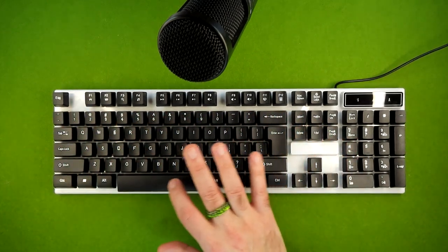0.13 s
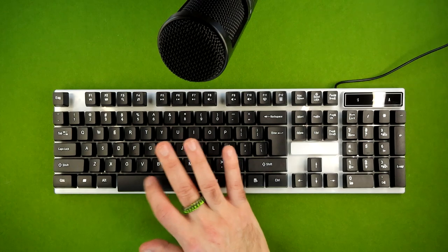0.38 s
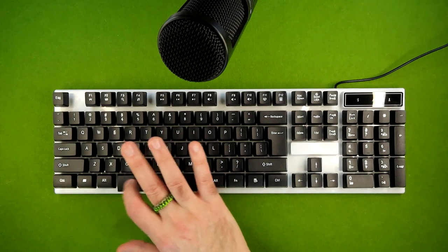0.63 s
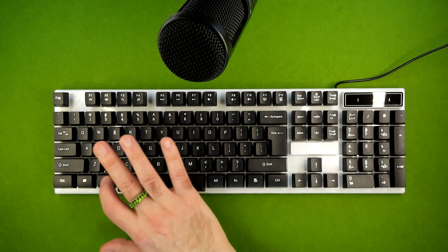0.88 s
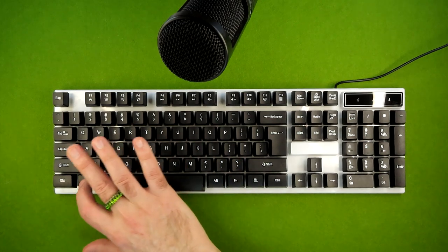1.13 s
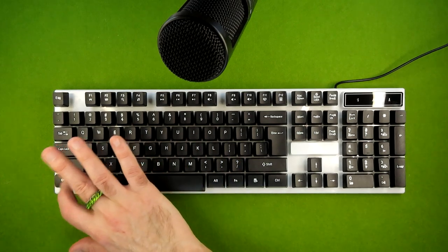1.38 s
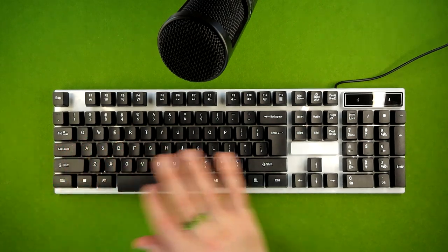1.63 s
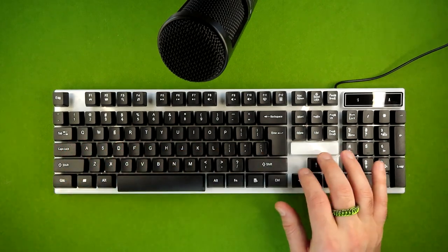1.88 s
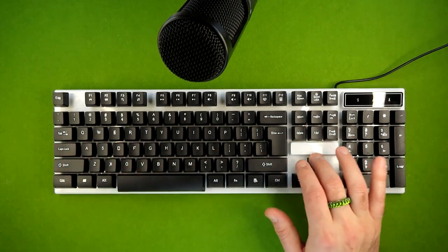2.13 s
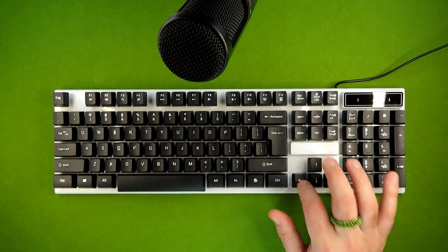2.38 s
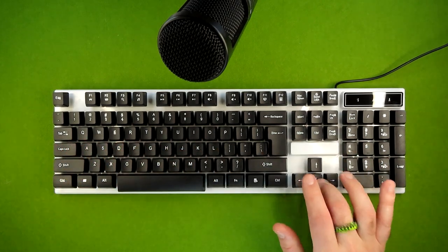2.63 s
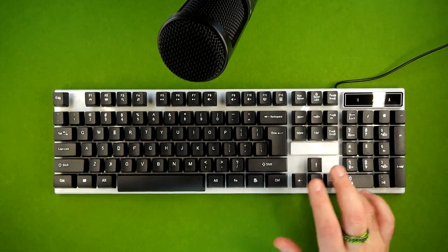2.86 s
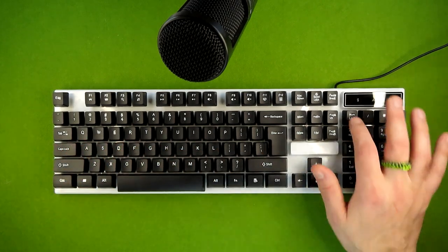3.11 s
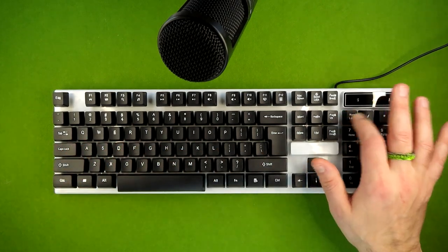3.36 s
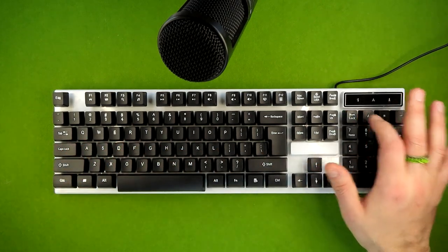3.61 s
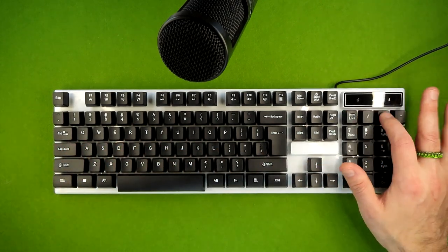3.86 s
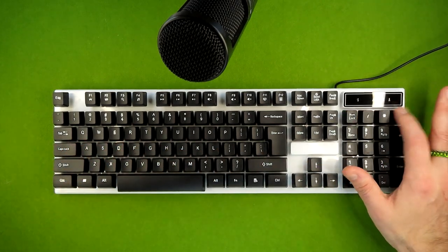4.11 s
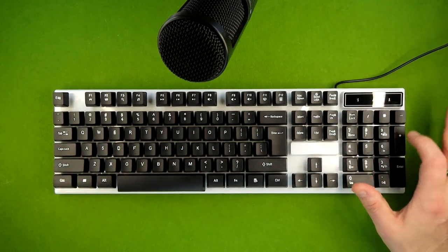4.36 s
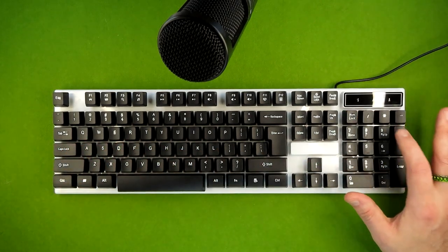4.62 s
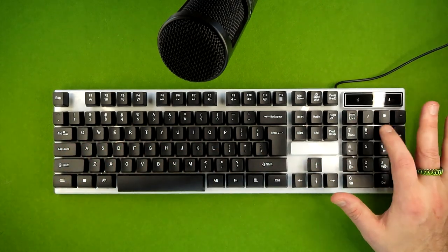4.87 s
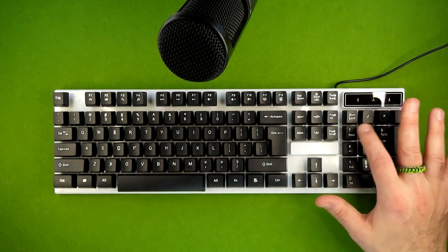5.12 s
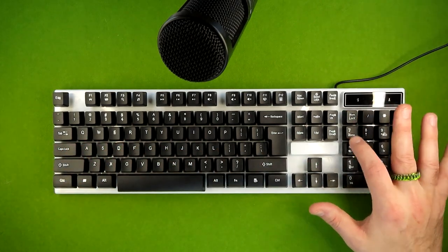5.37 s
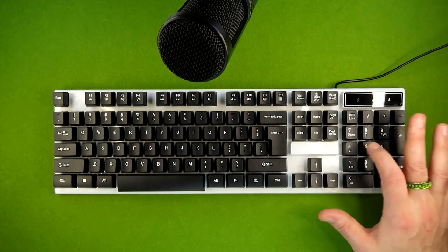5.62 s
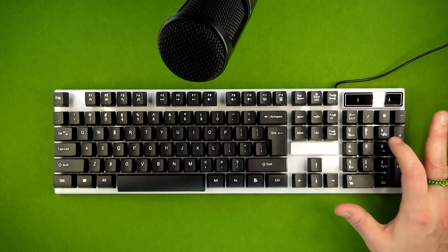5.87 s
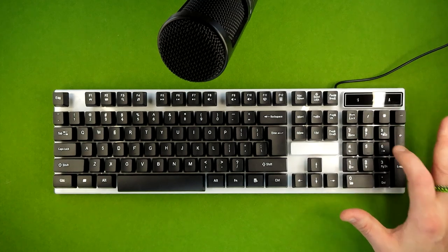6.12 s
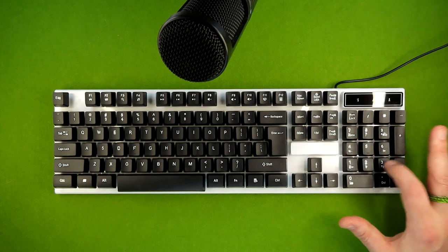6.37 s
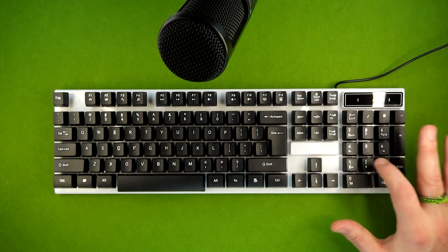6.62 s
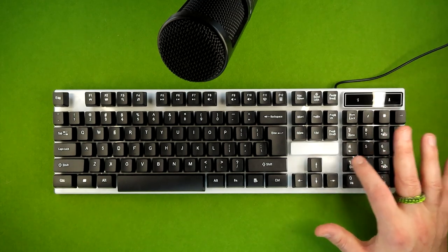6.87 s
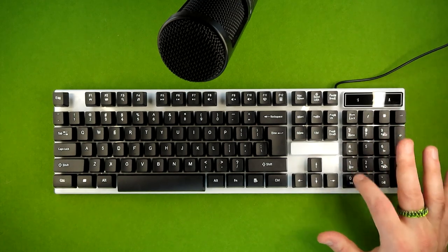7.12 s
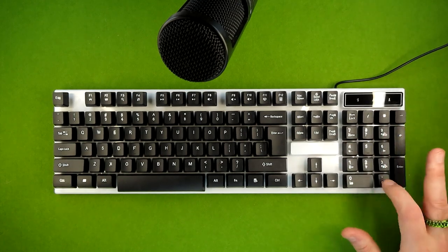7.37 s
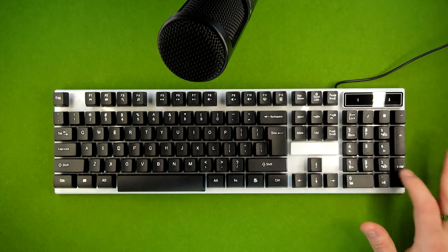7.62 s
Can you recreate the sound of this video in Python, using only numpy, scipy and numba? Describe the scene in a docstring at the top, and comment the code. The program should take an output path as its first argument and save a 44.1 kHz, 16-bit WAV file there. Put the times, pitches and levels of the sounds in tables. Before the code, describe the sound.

A close, dry single-channel microphone hears one finger pressing plastic keys on a light keyboard in a quiet room. From 0 to 1.5 seconds six large loose keys are struck about every 0.28 seconds: the first three clack loud, sharp and bright with hollow rattle, the next three softer. Each release clicks about 0.1 seconds after the press. A gap follows until 2.1, where a hand lands very softly and smaller keys begin, tighter and mid-pitched, until 2.95. After another short pause, strokes resume at 3.3 and run on every quarter second or so, firm around 4.5, faint from 5 to 5.9, then stronger from 6.1 to the last clack near 7.7. Faint stem scraping, creaks and tiny bounce ticks surround the knocks. Presses give low, soft desk thuds with slow wobble. Beneath lie low rumble, faint hiss and a barely audible thin whine.

```python
"""Gritty clicks and clatter of plastic keys on a light keyboard, pressed and released one after another by one finger.
Each knock is a rough contact force driving modes of cap and case, with a faint graze before and chatter after it.
Stems rub in their guides (noise that swells and fades with each stroke), pushes shake desk and microphone stand
(thuds and slow decaying sines), and a hand lands softly once (rustle in the hollow modes).
Behind it: rumble, faint hiss, thin electrical whine."""
import sys
import numpy as np
from scipy import signal
from scipy.fft import rfft, irfft
from scipy.io import wavfile
from scipy.ndimage import uniform_filter1d
from numba import njit

SR = 44100
rng = np.random.default_rng(int(sys.argv[2]) if len(sys.argv) > 2 else 0)


def to_wav(sig):
    """Store sig (one row per channel, or 1-D mono) as 16-bit WAV at the path in sys.argv[1].

    Samples outside -1..1 are clipped; the rate is SR.
    """
    pcm = np.clip(np.atleast_2d(sig), -1, 1) * 32767
    pcm = np.round(pcm).astype(np.int16)
    wavfile.write(sys.argv[1], SR, pcm.T)  # frames by channels


def volts_from_decibels(level):
    """Turn decibel levels (scalar or array-like) into linear amplitude factors."""
    exponent = np.asarray(level, float) / 20
    return 10 ** exponent


N = 341320

# clear knocks of stem, cap and guide:
# (time [s], peak level [dB], cap note [Hz], case share [dB], edge share [dB])
KNOCKS = [(0.0335, -7, 4230, -18, -2.5), (0.0408, -18.5, 2520, -12, -6), (0.0531, -37, 4340, -6, -18),
          (0.12, -21.5, 990, 10, 2), (0.1254, -15.5, 4080, -7.5, 4.5), (0.1333, -26, 4880, -24, -5),
          (0.1359, -25, 4130, -16, -6.5), (0.1434, -31.5, 2060, -5, -16), (0.1683, -39.5, 4760, -5, -4),
          (0.3081, -11.5, 7740, -26.5, -2.5), (0.312, -14.5, 4080, -32, -13.5),
          (0.3268, -33, 3280, -22, -16.5), (0.36, -43, 3560, -23, -14), (0.3918, -11, 7440, -1, 11),
          (0.4011, -23, 4120, -12, -5), (0.4161, -36.5, 7000, -11, -1.5), (0.5893, -8.5, 2870, -14.5, 2.5),
          (0.6809, -25, 2460, 3, -9), (0.6825, -22.5, 863, 11, 14.5), (0.688, -24, 4830, -22, 5.5),
          (0.695, -28, 4420, -7, -8), (0.7107, -34.5, 4500, -23, -1), (0.8764, -24.5, 1796, -11, -11),
          (0.8806, -26.5, 1700, -4, 3), (0.8842, -27.5, 2560, -2, -11), (0.962, -21, 2860, 2.5, -6.5),
          (1.1402, -30.5, 3010, -21.5, -24.5), (1.1448, -23.5, 1590, -15, -4.5),
          (1.152, -38.5, 3540, 10.5, -17.5), (1.2396, -20, 1487, 1.5, 0.5),
          (1.411, -27.5, 4700, -15.5, -41), (1.412, -28, 3450, -6, -25), (1.4176, -25.5, 2780, 3, -32.5),
          (1.4239, -27.5, 3510, -6, -34), (1.4275, -38, 3680, -13, -36.5), (1.4466, -29.5, 5540, 1, -15.5),
          (1.473, -30, 3590, -15, -17), (1.4813, -18.5, 1840, -1, -6.5), (2.0935, -32, 1500, 12, 1),
          (2.099, -20.5, 2255, -33, -2), (2.1851, -43, 890, -10, -28), (2.2192, -31.5, 2200, -1, -9.5),
          (2.222, -26, 1500, 3, -22.5), (2.319, -29.5, 2350, 7, -10), (2.338, -34.5, 1910, -5.5, -5),
          (2.3764, -42.5, 1900, -2, -30), (2.4385, -30, 2100, -3.5, -8.5), (2.4437, -30, 900, 11, -9),
          (2.5893, -17, 2840, -2, -6.5), (2.5968, -36, 2200, -0.5, 1.5), (2.6074, -29, 3330, -21, 4),
          (2.6175, -35.5, 3970, -27, -11.5), (2.6999, -22.5, 2200, 4, -0.5), (2.8233, -26.5, 2300, -11, -1),
          (2.8313, -37.5, 823, 1, -2), (2.936, -24.5, 1704, 6.5, -0.5), (3.3099, -24.5, 840, 6.5, 1),
          (3.4068, -30, 1530, -13, -0.5), (3.5499, -15.5, 5850, 2, -20), (3.5556, -16.5, 1546, -11, -3.5),
          (3.6507, -32, 1260, 11, -20), (3.6563, -23, 1212, 7, 7), (3.9287, -27, 1660, -20, 4.5),
          (3.9421, -27.5, 1107, -16, -3), (4.0428, -20, 1310, 4.5, 1.5), (4.1968, -24.5, 2520, 5, -1),
          (4.2144, -35.5, 2470, -21, -25), (4.2203, -25, 3400, -27, 2), (4.296, -17, 2200, 3.5, 0.5),
          (4.4974, -15.5, 1300, 3, -8.5), (4.5099, -29, 1114, 10, -31), (4.6205, -15, 1636, 3.5, -2),
          (4.7816, -22, 1550, 6.5, -1), (4.793, -31.5, 1410, 0, -7), (4.8767, -21, 1505, -1.5, -3.5),
          (5.057, -31.5, 1450, -20, -5.5), (5.0622, -38, 2200, -8, -11), (5.071, -37.5, 1440, 0, -13),
          (5.1484, -29.5, 1420, 9, 3), (5.2829, -31, 2700, -20, -13.5), (5.2921, -32.5, 2350, 1.5, -4.5),
          (5.35, -46, 1270, 0, -18), (5.3815, -41, 2640, 3, -24.5), (5.3911, -38.5, 1070, 0, -19),
          (5.5114, -41.5, 5970, 1.5, 7), (5.5198, -29.5, 1244, -2, -6), (5.6064, -35, 2470, 2.5, -9),
          (5.6154, -38, 2540, 15, -10.5), (5.7703, -25, 2440, -0.5, -3.5), (5.7794, -25, 2440, -17, -1.5),
          (5.8472, -33, 1260, -3, 2.5), (5.8611, -34, 2040, 6, -4.5), (5.8666, -34.5, 2920, 1, -14.5),
          (6.0222, -24.5, 1037, -16, -4.5), (6.039, -32, 1595, -27, -16), (6.073, -44, 1400, -20, -30.5),
          (6.1446, -16, 1305, 3.5, 3), (6.4566, -22.5, 2310, 1, -11), (6.4635, -20.5, 2320, -32, -0.5),
          (6.5105, -37, 1550, -20, -28), (6.5546, -11, 2480, -0.5, -6), (6.7382, -17, 2550, -10, -8),
          (6.8252, -21.5, 2070, -20, 2), (6.9883, -25.5, 3240, -1, -3.5), (6.9983, -24, 1690, 2, -17),
          (7.0882, -23, 2100, -1.5, -8), (7.232, -22, 1850, -1, -1.5), (7.2396, -30.5, 1960, 2, -4),
          (7.33, -12.5, 1970, 5.5, 2.5), (7.338, -24.5, 1837, -6, -8), (7.475, -17.5, 2370, -6.5, -6.5),
          (7.5872, -21.5, 1814, 4, -10), (7.7125, -25.5, 1285, 2, -15), (7.7145, -17.5, 1104, 2, 0.5),
          (7.721, -26.5, 2280, 5, -16), (7.7301, -29, 6000, -24, 10.5)]
# strokes: (down [s], up [s], hollow modes against case share [dB], chatter centre [Hz], rub while rising [dB])
KEYS = [(0.04, 0.137, -0.5, 4430, -60), (0.314, 0.387, 1, 7500, -56.5), (0.597, 0.696, 3, 6260, -60),
        (0.874, 0.956, -6, 5000, -61), (1.15, 1.244, -3.5, 5940, -63), (1.417, 1.479, -1, 8040, -61),
        (2.099, 2.223, -16, 5900, -61), (2.326, 2.438, -22, 6060, -61), (2.596, 2.705, -22, 5950, -65.5),
        (2.829, 2.933, -16.5, 6000, -65.5), (3.315, 3.403, -23, 5940, -57), (3.554, 3.662, -28, 5690, -59),
        (3.94, 4.049, -27.5, 5740, -59.5), (4.201, 4.295, -22.5, 5930, -56.5),
        (4.508, 4.62, -19.5, 6940, -59), (4.785, 4.878, -26.5, 6060, -57.5),
        (5.07, 5.148, -22.5, 8200, -61), (5.291, 5.383, -19.5, 6050, -62),
        (5.518, 5.601, -16.5, 5930, -59.5), (5.779, 5.862, -19, 5870, -59.5),
        (6.031, 6.143, -22.5, 6080, -55.5), (6.465, 6.555, -22.5, 5860, -58.5),
        (6.745, 6.825, -1.5, 6100, -64.5), (6.995, 7.085, -21.5, 6000, -62), (7.24, 7.33, -13.5, 8980, -55),
        (7.483, 7.588, -17.5, 5920, -65.5), (7.719, 7.81, -19, 6700, -55)]
# desk response per key, same order:
# (press thud [dB], press thud [Hz], release thud [dB], release wobble [dB])
PUSHES = [(-18.5, 44, -30, -40.5), (-19, 49.3, -30, -34.5), (-20, 45, -33, -33.5), (-23, 44, -43, -31.5),
          (-17.5, 54.4, -37.5, -35.5), (-11.5, 59, -34.5, -30), (-24.5, 45, -40.5, -51.5),
          (-28.5, 42.5, -45, -50), (-17, 51, -42, -33.5), (-26, 51.5, -40, -37.5), (-24, 50.3, -41, -35),
          (-21, 53, -42.5, -31), (-28.5, 53, -42.5, -54), (-18.5, 63.7, -32, -33.5), (-23, 62, -33.5, -53),
          (-26, 52, -35.5, -49.5), (-27.5, 59, -36.5, -52.5), (-30, 49, -37.5, -48), (-27, 49.7, -36, -70),
          (-25, 59, -36, -51), (-28, 63, -40, -56), (-20.5, 56.3, -36.5, -36.5), (-24, 63, -37, -35.5),
          (-22.5, 51, -39, -36), (-23.5, 52.3, -40, -44.5), (-22.5, 57.3, -50, -36), (-12.5, 68, -40, -40)]
# hollow modes of the keyboard: (nominal frequency [Hz], relative level [dB], t60 [s])
HOLLOW_MODES = [(252, -3, 0.026), (318, -7.5, 0.034), (486, 2.5, 0.015)]


def coloured(n, points):
    """Noise of rms 1 with the spectrum of (Hz, dB) points."""
    hz, db = np.transpose(points)
    f = np.maximum(np.fft.rfftfreq(n, 1 / SR), 1)
    gain = volts_from_decibels(np.interp(np.log(f), np.log(hz), db))
    x = irfft(rfft(rng.standard_normal(n)) * gain, n)
    return x / x.std()


def walk(rate_hz):
    """Random levels, one every 1 / rate_hz s, joined by ramps; spread near 1."""
    k = int(SR / rate_hz)
    held = np.repeat(rng.standard_normal(N // k + 1), k)
    return uniform_filter1d(held, k)[:N]


def add(out, s, sound):
    """Mix a sound in at a time in seconds."""
    i = int(s * SR)
    out[i:i + len(sound)] += sound[:max(len(out) - i, 0)]


@njit
def ring(push, hz, gain, t60, size):
    """A force drives decaying modes; the first size samples get energy 1."""
    out = np.zeros(len(push))
    for m in range(len(hz)):
        pole, z = np.exp((2j * np.pi * hz[m] - np.log(1000) / t60[m]) / SR), 0j
        for i in range(len(push)):
            z = z * pole + push[i]
            out[i] += gain[m] * z.imag
    return out / np.sqrt(np.sum(out[:size] ** 2))


def part(push, modes, chance, spot_db=2.33, detune=0.068):
    """One part answers a force; the spot that is hit shifts and weights its modes."""
    hz, db, t60 = np.transpose(np.array(modes, float))
    k = len(hz)
    hz = np.minimum(hz * (1 + detune * chance[0, :k]), 0.45 * SR)
    gain = (-1.) ** np.arange(k) * volts_from_decibels(db + spot_db * chance[1, :k])  # alternate signs
    return ring(push, hz, gain, t60, size=min(200, len(push)))


def knocks(contact_s=0.00083, rattle_db=-20, rattle_t60=0.071, room_db=-38, room_t60=0.18,
           note_db=4.0, note_turns=22, note_max_t60=0.018, cap_db=4.0, lean_db_per_octave=7,
           chatter_db=-22, chatter_t60=0.13, chatter_ring_t60=0.0074, box_db=-24,
           snap_db=12, tip_db=-2, tip_slope=0.45, graze_db=-28, graze_s=0.0075, size=7000):
    """Short gritty contact, loose rattle and diffuse room return drive the modes of cap, edge and case."""
    # modes by part: (nominal frequency [Hz], relative level [dB], t60 [s])
    case_modes = [(620, -26.5, 0.0086), (766, 2.5, 0.006), (880, 1.5, 0.0082), (993, 1.5, 0.0047),
                  (1400, 8.5, 0.0028)]
    cap_modes = [(1550, -6.5, 0.0057), (1850, 2, 0.0047), (2200, 5.5, 0.0048), (2656, 7.5, 0.0035),
                 (2980, -2.5, 0.011), (3830, 1, 0.0058), (4305, -7.5, 0.0059), (4665, -10.5, 0.017),
                 (5594, 4, 0.00046)]
    edge_modes = [(5900, 0, .004), (6600, -3, .003), (7400, -3, .0025), (8300, -4, .0022), (9300, -5, .002)]
    # highest treble: (nominal frequency [Hz], relative level [dB], t60 [s])
    tip_modes = [(10500, -7, 0.00022), (10860, 1.5, 0.0021), (13700, 2.5, 0.00078), (14400, 0.5, 0.0022)]
    t = np.arange(size) / SR
    onset = np.minimum(t / contact_s, 1)
    contact = t / contact_s * np.exp(1 - t / contact_s)
    rattle = volts_from_decibels(rattle_db) * 1000 ** (-t / rattle_t60)
    room = volts_from_decibels(room_db) * 1000 ** (-t / room_t60)
    force = (contact + rattle + room) * onset
    hits = list(KNOCKS) + ticks()
    grit = rng.standard_normal((len(hits), size))
    chance = rng.standard_normal((len(hits), 4, 2, len(cap_modes)))
    downs = np.array(KEYS)[:, 0]
    small_box = signal.butter(6, 600, "high", fs=SR, output="sos")
    big_cap = signal.butter(3, 170, "high", fs=SR, output="sos")
    # parts graze each other for a moment before they meet
    lead = np.sqrt(200) * np.exp(-t[130::-1] / graze_s)
    graze_modes = cap_modes + edge_modes
    centred = np.zeros((2, len(graze_modes)))
    out = np.zeros(N)
    for (s, peak_db, note_hz, case_db, edge_db), rough, (a, b, c, d) in zip(hits, grit, chance):
        _, _, hollow_db, chatter_hz, _ = KEYS[max(np.searchsorted(downs, s + 0.03) - 1, 0)]
        graze = lead * part(rough[:len(lead)], graze_modes, centred)
        add(out, s - len(lead) / SR, signal.sosfilt(small_box, volts_from_decibels(peak_db + graze_db) * graze))
        push = force * rough
        push[int(contact_s * SR)] += volts_from_decibels(snap_db)  # one hard snap in the grit
        # the cap's own note dies after a few turns, so high notes are the shortest
        note = [(note_hz, 0, min(note_turns / note_hz, note_max_t60))]
        sound = volts_from_decibels(note_db) * part(push, note, 0 * a)
        # cap modes far from that note answer less
        leaning = [(hz, db - lean_db_per_octave * abs(np.log2(hz / note_hz)), t60)
                   for hz, db, t60 in cap_modes]
        sound = sound + volts_from_decibels(cap_db) * part(push, leaning, a)
        sound = sound + volts_from_decibels(case_db) * part(push, case_modes, b)
        sound = sound + volts_from_decibels(edge_db) * part(push, edge_modes, c)
        # big hollow caps are loose and spray more of the highest treble
        sound = sound + volts_from_decibels(edge_db + tip_db + tip_slope * hollow_db) * part(push, tip_modes, b[:, ::-1])
        # the shaken cap keeps chattering on its stem, in a narrow band per key
        chatter = rough[::-1] * onset * 1000 ** (-t / chatter_t60)
        sizzle = part(chatter, [(chatter_hz, 0, chatter_ring_t60)], 0.18 * d)
        sound = sound + volts_from_decibels(edge_db + chatter_db) * sizzle
        # the same chatter hums in upper case and lower cap modes
        sound = sound + volts_from_decibels(box_db) * part(chatter, case_modes[2:] + cap_modes[:3], 0 * a)
        # parts this small radiate no bass
        sound = signal.sosfilt(small_box, sound)
        hollow = part(push, HOLLOW_MODES, d)
        sound = sound + volts_from_decibels(case_db + hollow_db) * signal.sosfilt(big_cap, hollow)
        loudest = np.sqrt(2 * uniform_filter1d(sound ** 2, size=40).max())
        add(out, s, sound * volts_from_decibels(peak_db) / loudest)
    return out


def ticks(scatter_db=5.5, spread_octaves=0.54, case_db=-6, edge_db=-14, quiet_db=-18, follow=0.45,
          near_s=0.02, loose_slope=0.24, top_hz=4000):
    """Rows like KNOCKS: the cap bounces and creaks after a press; the stem catches before it tops out, then settles."""
    # faint ticks around the loudest knock of a stroke: (lag [s], scatter [s], level against base_db [dB])
    press_ticks = [(0.016, 0.0038, -22.5), (.028, 0.0079, -27)]
    release_ticks = [(-.022, 0.0028, -32), (-.0105, 0.0011, -22.5), (.009, 0.0022, -24),
                     (0.024, 0.0055, -30.5)]
    loud, rows = np.array(KNOCKS), []
    for down, up, hollow_db, *_ in KEYS:
        for s, rule in ((down, press_ticks), (up, release_ticks)):
            chance = rng.standard_normal((len(rule), 5))
            near = loud[abs(loud[:, 0] - s) < near_s]
            if not len(near):
                continue
            at, peak_db, note_hz = near[near[:, 1].argmax(), :3]
            # ticks follow the stroke's force only in part; loose hollow caps clatter more
            base_db = quiet_db + follow * (peak_db - quiet_db) + loose_slope * hollow_db
            for (lag_s, jitter_s, db), c in zip(rule, chance):
                rows.append((at + lag_s + jitter_s * c[0],
                             base_db + db + scatter_db * c[1],
                             min(note_hz, top_hz) * 2 ** (spread_octaves * c[2]),
                             case_db + 2 * scatter_db * c[3],
                             edge_db + 2 * scatter_db * c[4]))
    return rows


def rub(catch_db=3.5, lead_s=0.005, lead_db=6, rise_s=0.055, settle_s=0.12, settle_db=-22,
        bright_db=6, bright_slope=0.42, hold_db=-41, hold_slope=1.0, early_s=0.006,
        approach_s=0.053, approach_db=-72, case_db=-3, case_slope=-0.094, squeak_db=-3,
        last_db=3, stop_s=0.015, stop_db=-6):
    """Plastic on plastic: the stem scrapes going down, creaks while held, scrapes rising, then settles."""
    # rub spectrum: (frequency [Hz], relative level [dB])
    rub_colour = [(300, -29.5), (700, -5), (1250, 0.5), (1700, -6), (2350, -2), (3300, -7.5), (5000, -11),
                  (5950, -5.5), (6800, -15.5), (9000, -16.5), (16000, -26.5)]
    t = np.arange(N) / SR
    low_gain, mid_gain, bright_gain, squeak = np.zeros((4, N))
    catch = [volts_from_decibels(catch_db * walk(250)) for _ in range(3)]  # uneven grip, per band
    for (down, up, hollow_db, chatter_hz, rising_db), (press_db, *_) in zip(KEYS, PUSHES):
        down = down - early_s
        # the harder the finger leans, the louder the creak
        held_db = hold_db + hold_slope * press_db
        s = [down - approach_s, down - approach_s / 2, down - lead_s, down, down + lead_s,
             up - rise_s, up - rise_s / 2, up, up + stop_s, up + settle_s, up + 2 * settle_s]
        db = [-92, approach_db, approach_db + 3, held_db + lead_db, held_db,
              held_db, rising_db, rising_db + last_db, rising_db + stop_db, rising_db + settle_db, -100]
        key = volts_from_decibels(np.interp(t, s, db, left=-200, right=-200))
        # loose big caps scrape brighter, tight small ones pass more to the case
        mid_gain += key
        bright_gain += key * volts_from_decibels(bright_db + bright_slope * hollow_db)
        low_gain += key * volts_from_decibels(case_db + case_slope * hollow_db)
        # the rub also sings in the band where this cap chatters
        i, j = max(int(s[0] * SR), 0), min(int(s[-1] * SR), N)
        band = signal.butter(1, [0.96 * chatter_hz, 1.04 * chatter_hz], "band", fs=SR, output="sos")
        squeak[i:j] += volts_from_decibels(squeak_db) * key[i:j] * signal.sosfilt(band, rng.standard_normal(j - i))
    noise = coloured(N, rub_colour)
    deep = signal.sosfiltfilt(signal.butter(2, 1700, fs=SR, output="sos"), noise)
    dull = signal.sosfiltfilt(signal.butter(2, 3000, fs=SR, output="sos"), noise)
    low = low_gain * catch[0] * deep
    mid = mid_gain * catch[1] * (dull - deep)
    treble = catch[2] * (bright_gain * (noise - dull) + squeak)
    return low + mid + treble


def desk(thud_turns=0.65, thud_radians=0.6, shelf_db=-8, shelf_db_per_hz=0.5, tray_db=-18, top_hz=220,
         sway_db=-1, sway_db_per_hz=0.66, press_wobble_db=-22, release_sway_db=-9,
         release_hz=69.94, release_lag_s=0.0057):
    """A push gives a short thud, then stand and desk top swing on; so much mass cannot move fast."""
    # slow swings of stand and desk: (frequency [Hz], t60 [s], lag behind the thud [s])
    sway = (23, .85, .021)
    wobble = (42, .5, .011)
    shelf = (100, 0.48, 0.016)
    tray = (125, 0.094, .008)
    t, out = np.arange(SR) / SR, np.zeros(N)
    for (down, up, *_), (press_db, press_hz, release_db, wobble_db) in zip(KEYS, PUSHES):
        # the slower the thud of a press, the more it sways the stand
        press_sway_db = press_db + sway_db - sway_db_per_hz * (press_hz - wobble[0])
        press = down, press_sway_db, press_db + press_wobble_db, press_db, press_hz
        release = up + release_lag_s, release_db + release_sway_db, wobble_db, release_db, release_hz
        for s, stand_db, rock_db, thud_db, thud_hz in (press, release):
            rise = t * thud_hz / thud_turns
            envelope = (rise * np.exp(1 - rise)) ** 2
            add(out, s, volts_from_decibels(thud_db) * envelope * np.sin(2 * np.pi * thud_hz * t + thud_radians))
            # thuds near the note of the desk top ring it best
            top_db = thud_db + shelf_db - shelf_db_per_hz * abs(thud_hz - shelf[0])
            swings = (sway, stand_db), (wobble, rock_db), (shelf, top_db), (tray, thud_db + tray_db)
            for (hz, t60, lag_s), db in swings:
                add(out, s + lag_s, volts_from_decibels(db) * 1000 ** (-t / t60) * np.sin(2 * np.pi * hz * t))
    return signal.sosfiltfilt(signal.butter(2, top_hz, fs=SR, output="sos"), out)


def landing():
    """A soft hand on the case: decaying noise rustles dully in its lowest modes."""
    # the hand lands: (time [s], level before the band filter [dB], t60 [s])
    touch = (2.1, -46, 0.08)
    s, db, t60 = touch
    t, out = np.arange(SR // 4) / SR, np.zeros(N)
    rustle = rng.standard_normal(len(t)) * 1000 ** (-t / t60)
    sound = part(rustle, HOLLOW_MODES, np.zeros((2, len(HOLLOW_MODES))))
    add(out, s, volts_from_decibels(db) * np.sqrt(200) * sound)
    return signal.sosfilt(signal.butter(4, [190, 480], "band", fs=SR, output="sos"), out)


def quiet(floor_db=-50.5):
    """Rumble and hiss of room and preamplifier, with an unsteady whine near multiples of one kilohertz."""
    # floor spectrum: (frequency [Hz], relative density [dB per Hz])
    hiss_colour = [(12, -36.5), (20, 2.5), (63, -5.5), (86, -19.5), (150, -27.5), (204, -42), (277, -36.5),
                   (337, -43), (738, -48.5), (1960, -52.5), (2320, -53.5), (13500, -56), (16000, -53)]
    # whine: (frequency [Hz], middle rms level [dB])
    whine_tones = [(1001, -99), (1997, -94.5), (2998, -95), (4000, -95), (4996, -103)]
    t = np.arange(N) / SR
    whine = np.zeros(N)
    for hz, db in whine_tones:
        whine += volts_from_decibels(db + 2 * walk(3.9)) * np.sqrt(2) * np.sin(2 * np.pi * hz * t)
    return volts_from_decibels(floor_db) * coloured(N, hiss_colour) + whine


def scene():
    """Keys, the shaken desk, the hand and the quiet floor, in one channel."""
    return (knocks() + rub() + desk() + quiet() + landing())[None]


def low_pass(x):
    """Removes everything above the highest recorded frequency."""
    return signal.sosfilt(signal.butter(12, 16980, fs=SR, output="sos"), x)


def record(dry):
    """A close microphone that rolls off at the very top."""
    top_hz = 15600
    mix = signal.sosfilt(signal.butter(9, top_hz, fs=SR, output="sos"), dry)
    return low_pass(mix)


dry = scene()
out = record(dry)
to_wav(out)
```